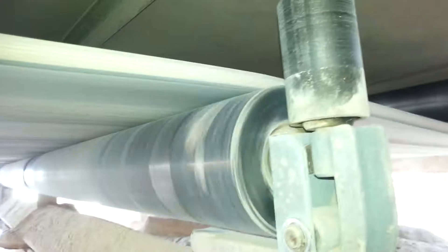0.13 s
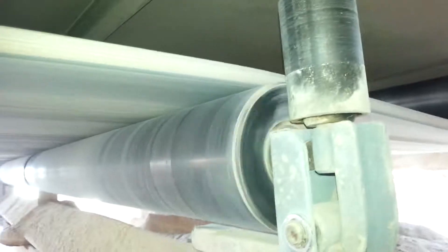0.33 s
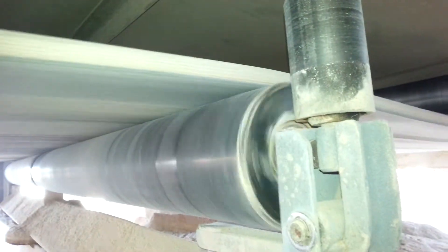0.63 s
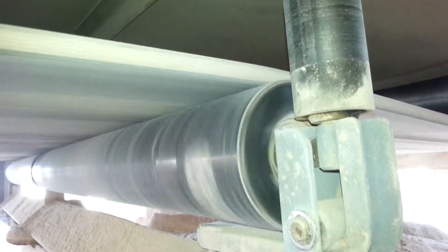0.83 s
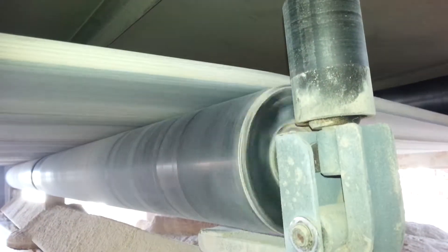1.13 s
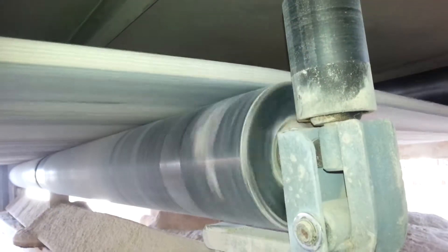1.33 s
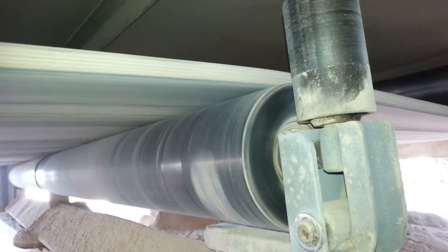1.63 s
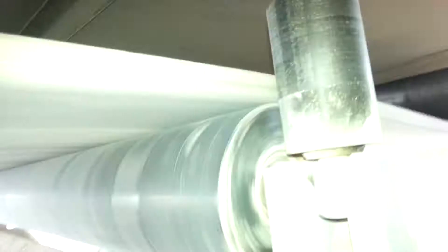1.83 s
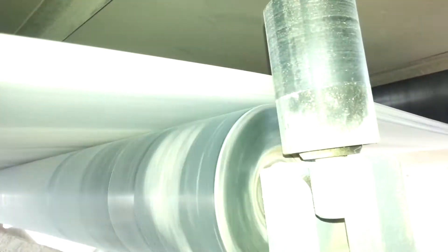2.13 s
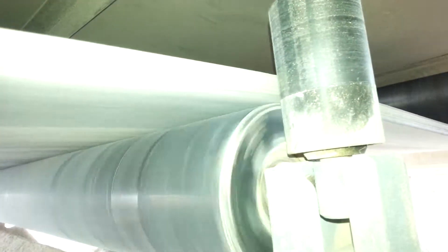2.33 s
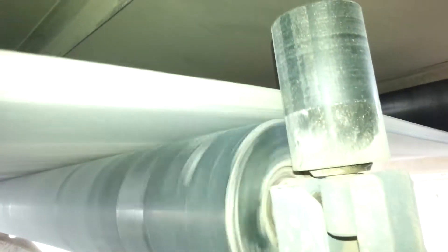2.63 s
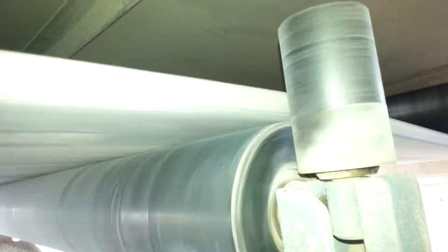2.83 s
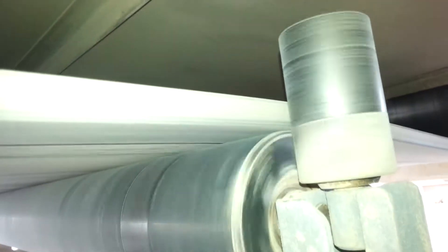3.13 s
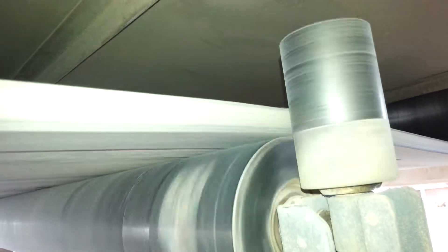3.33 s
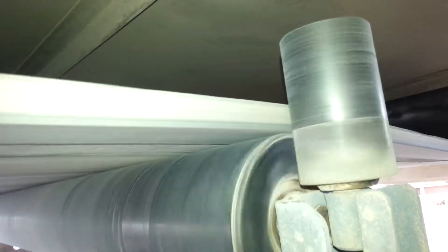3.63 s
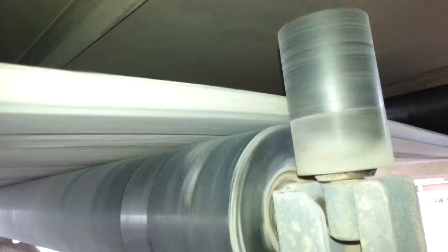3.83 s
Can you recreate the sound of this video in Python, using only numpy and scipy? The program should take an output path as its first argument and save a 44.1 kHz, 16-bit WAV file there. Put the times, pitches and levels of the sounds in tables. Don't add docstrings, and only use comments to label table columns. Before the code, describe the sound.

A conveyor belt roars nonstop in its steel frame as loose rollers rattle in irregular metallic clicks and dull thuds; worn bearings grind. Very close handheld phone, stereo, slightly overloaded, short industrial hall echo.

```python
import sys
import numpy as np
from scipy import signal
from scipy.fft import rfft, irfft
from scipy.io import wavfile
from scipy.ndimage import uniform_filter1d

SR = 44100
rng = np.random.default_rng(int(sys.argv[2]) if len(sys.argv) > 2 else 0)


def generate_wav(sig):
    pcm = np.round(np.clip(np.atleast_2d(sig).T, -1, 1) * 32767).astype(np.int16)
    wavfile.write(sys.argv[1], SR, pcm)


def undo_db(level):
    steps = np.asarray(level, float) / 20
    return 10 ** steps


N = 176400
T = np.arange(N) / SR
F = np.maximum(np.arange(N // 2 + 1) * SR / N, 1)
PORT_LAG_S, PORT_GAP_M, SOUND_M_PER_S = 0.0002675, 0.15, 343


# (frequency [Hz], density [dB per Hz])
ROAR_SPECTRUM = [
    (110, -52.5),
    (216, -8),
    (734, 1.5),
    (1500, 3.5),
    (3700, -2.5),
    (5800, -13),
    (9400, -16),
    (14400, -35.5),
]
# (time [s], load [dB], brightness [dB])
BELT_LOAD = [(0.3, -14, -5), (0.37, -12.5, -8), (1.21, -16, -4.5), (1.82, -13, -8), (2.0, -17, -5.5),
             (2.09, -13, -8.5), (2.71, -14.5, -8), (3.2, -11, -12.5), (3.51, -17.5, -2), (3.71, -13, -11.5),
             (3.88, -12, -9), (4.0, -18, -5)]
ROAR_DB, SWELL_DB, FLICKER_DB = -12.5, 0.5, 1


def belt():
    load = np.array(BELT_LOAD, float)
    level, bright = (np.interp(T, load[:, 0], c - c.mean()) for c in load[:, 1:].T)
    spectrum = rfft(field()) * undo_db(curve(ROAR_SPECTRUM, F))
    swell, roar = walk(8.1), 0
    for step in range(-3, 13):
        distance = np.clip(2 * np.log2(F / 250) - step, -1, 1)
        band = np.cos(np.pi / 2 * distance) ** 2
        tilt = np.clip(step / 10, 0, 1)
        band_db = level + tilt * bright + SWELL_DB * tilt * swell + FLICKER_DB * walk(14)
        roar = roar + irfft(spectrum * band, N) * undo_db(band_db)
    return undo_db(ROAR_DB) * unit(roar) + frame(level)


# (frequency [Hz], width [Hz], level [dB])
FRAME_MODES = [(187.3, 31, -15.5), (229.7, 58, -11.5), (411.4, 72, -6), (541.6, 130, 0.5), (674, 46, 0.5),
               (746.76, 61, 3.5), (829, 66, -4.5), (1042.5, 34, -5), (1210, 49, -2), (1970, 176, -4.5),
               (2450, 176, -8), (3160, 51, -5), (3390, 53, -8)]
FRAME_DB, FRAME_WALK_DB, FRAME_WALK_PER_S = -21, 2.5, 14


def frame(level_db):
    drive, out = field(), 0
    for hz, width_hz, db in FRAME_MODES:
        mode = unit(ring(ring(drive, hz, width_hz), hz, width_hz))
        out = out + undo_db(db + FRAME_WALK_DB * walk(FRAME_WALK_PER_S) + level_db) * mode
    return undo_db(FRAME_DB) * unit(out)


def field(near_share=0.12):
    flicker_db = 0.94 * np.array([walk(400), walk(400), walk(400)])
    a, b, close = rng.standard_normal((3, N)) * undo_db(flicker_db)
    coherence = np.sinc(2 * F * PORT_GAP_M / SOUND_M_PER_S)
    mid = rfft(a) * np.sqrt((1 + coherence) / 2)
    side = rfft(b) * np.sqrt((1 - coherence) / 2)
    around = irfft(np.array([mid + side, mid - side]), N)
    return np.sqrt(1 - near_share) * around + np.sqrt(near_share) * near(close)


# (time [s], peak [dB], ring [Hz], length [s])
ROLLER_RATTLES = [(0.383, -0.5, 3180, 0.02), (0.492, -4.5, 2680, 0.013), (0.743, -2.5, 3370, 0.0114),
                  (0.774, -4, 2000, 0.0152), (0.9165, -13, 2600, 0.013), (1.005, 0.5, 2660, 0.017),
                  (1.282, 1.5, 3590, 0.019), (1.445, 2, 3413, 0.025), (1.5395, 1.5, 2746, 0.0158),
                  (1.881, -17, 3240, 0.013), (1.955, -1, 3160, 0.037), (2.0909, -0.5, 3140, 0.022),
                  (2.228, 4.5, 3021, 0.012), (2.415, 0, 2390, 0.021), (2.4515, 1.5, 3800, 0.028),
                  (2.545, 3.5, 3000, 0.0093), (2.64, 4, 3020, 0.0165), (2.7404, 2.5, 1980, 0.013),
                  (2.85, -5, 2030, 0.0173), (3.23, -2, 2450, 0.032), (3.279, -3.5, 1980, 0.0146),
                  (3.366, 1.5, 2750, 0.035), (3.399, -8, 2660, 0.014), (3.446, -4, 3280, 0.015),
                  (3.624, -1.5, 3976, 0.019), (3.673, -4.5, 3140, 0.019), (3.834, 2.5, 1510, 0.034),
                  (3.944, -8, 2550, 0.015), (3.972, 1.5, 3160, 0.017)]
# (time [s], peak [dB], ring [Hz], length [s])
ROLLER_TICKS = [(0.312, -6, 2030, 0.006), (0.4464, -11, 2460, 0.006), (0.555, -9.5, 2710, 0.006),
                (0.723, -10, 3370, 0.006), (0.8134, -9, 3470, 0.006), (0.87, 3, 2910, 0.006),
                (0.879, 1, 2600, 0.006), (0.949, -9, 3420, 0.006), (1.187, -3.5, 3430, 0.006),
                (1.4174, -6, 2060, 0.006), (1.64, -3, 1910, 0.006), (2.0403, -1, 3420, 0.006),
                (2.07, -9, 1770, 0.006), (2.722, 9, 3150, 0.006), (2.825, -3, 3490, 0.006),
                (2.9644, -11, 4090, 0.006), (3.0134, -5, 3470, 0.006), (3.1234, 1, 2390, 0.006),
                (3.204, -2, 3440, 0.006), (3.547, 5, 3740, 0.006), (3.6, -2, 3540, 0.006)]
# (time [s], peak [dB], length [s])
ROLLER_CHATTER = [(0.437, -27, 0.016), (0.59, -28, 0.017), (0.67, -20.5, 0.014), (0.808, -8.5, 0.014),
                  (0.836, -4, 0.014), (1.027, 0.5, 0.025), (1.124, -4, 0.0126), (1.192, -5.5, 0.037),
                  (1.422, -8, 0.028), (1.624, -8, 0.019), (1.655, -7.5, 0.015), (1.707, -6, 0.026),
                  (1.797, -24, 0.015), (2.037, -8, 0.0098), (2.125, -1.5, 0.016), (2.296, -10, 0.022),
                  (2.356, -21, 0.028), (2.957, -23, 0.016), (3.048, -9, 0.0185), (3.133, -9, 0.019),
                  (3.187, -7.5, 0.038), (3.4726, -1.5, 0.028), (3.565, -26, 0.014), (3.857, -13, 0.012)]
RATTLE_DB, TICK_DB, CHATTER_DB, CHATTER_LOW_HZ = -11.5, -12.5, -9.5, 2620
RING_DB, RING_ROUGH = 1, 0.45


def rattles():
    wide, out = unit(steel(clicks())), np.zeros((2, N))
    thin = unit(signal.lfilter(*signal.butter(1, CHATTER_LOW_HZ, "high", fs=SR), wide))
    waver = RING_ROUGH * np.array([walk(220), walk(320)])
    for start, db, length in ROLLER_CHATTER:
        at, shape = burst(start, length)
        out[:, at] += undo_db(db + CHATTER_DB) * shape * thin[:, at]
    ticks = [(start, db + TICK_DB, hz, length) for start, db, hz, length in ROLLER_TICKS]
    for start, db, hz, length in ROLLER_RATTLES + ticks:
        at, shape = burst(start, length)
        _, ring_shape = burst(start, length / 2)
        knock = ring_shape * tone(hz, at, waver, 0.25 / hz)
        out[:, at] += undo_db(db + RATTLE_DB) * (shape * wide[:, at] + undo_db(RING_DB) * knock)
    return out


CLICKS_PER_S, CLICK_DB, CLICK_NOISE, SPREAD_SHARE = 2600, 3, 0.79, 0.749


def clicks():
    draw = rng.random((3, 2, N))
    hit = draw[:, 0] < CLICKS_PER_S / SR
    x = np.sign(draw[:, 1] - 0.5) * hit * undo_db(CLICK_DB * rng.exponential(size=(3, N)))
    x = unit(x) + CLICK_NOISE * rng.standard_normal((3, N))
    return np.sqrt(1 - SPREAD_SHARE) * near(x[0]) + np.sqrt(SPREAD_SHARE) * x[1:]


# (frequency [Hz], density [dB per Hz])
STEEL_COLOUR = [
    (300, -31),
    (900, -4.5),
    (2000, -1),
    (3800, 1.5),
    (5200, -6.5),
    (7000, -11.5),
    (10000, -14.5),
    (14500, -46.5),
]
# (frequency [Hz], width [Hz], level [dB])
SHELL_MODES = [(1990, 110, -0.5), (2450, 99, -5), (3039, 30, -7), (3456, 29, -15.5), (3897, 24.2, -11.5),
               (4850, 27, -1.5), (5284, 40, -7), (5900, 34, -7.5), (6570, 45, -3), (7530, 66, -2),
               (8585, 154, -4)]
SHELL_DB, SHELL_WALK_DB, SHELL_WALK_PER_S = 1, 4, 25


def steel(x):
    x = irfft(rfft(x) * undo_db(curve(STEEL_COLOUR, F)), N)
    shell = 0
    for hz, width_hz, db in SHELL_MODES:
        mode_db = db + SHELL_DB + SHELL_WALK_DB * walk(SHELL_WALK_PER_S)
        shell = shell + undo_db(mode_db) * ring(x, hz, width_hz)
    return x + shell


# (time [s], peak [dB], pitch [Hz], length [s])
BELT_THUDS = [(0.371, -4, 560, 0.027), (0.454, -11.5, 570, 0.017), (0.764, -3.5, 560, 0.025),
              (0.43, -3, 1097, 0.03), (0.449, -3, 757, 0.0156), (0.737, 0, 1170, 0.027),
              (0.777, -4.5, 810, 0.023), (0.919, -3, 750, 0.036), (1.086, -4, 685, 0.022),
              (1.398, -1, 716, 0.029), (1.544, -3, 875, 0.028), (1.596, -10, 1070, 0.024),
              (1.805, -14, 673, 0.027), (2.08, -13, 805, 0.039), (2.099, -4.5, 506, 0.039),
              (2.285, -9, 677, 0.032), (2.507, -6.5, 760, 0.031), (2.634, -8, 860, 0.027),
              (3.014, -14.5, 550, 0.023), (3.245, -13, 750, 0.041), (3.645, -4.5, 756, 0.039),
              (3.758, -4, 789, 0.027), (3.831, -4, 665, 0.025), (3.848, -3, 1240, 0.029),
              (3.846, 0, 1960, 0.03), (3.881, -3.5, 1260, 0.025)]
# (time [s], peak [dB], pitch [Hz], length [s])
BELT_BUMPS = [(0.55, -5.5, 1180, 0.024), (0.665, -7, 886, 0.018), (0.85, -13.5, 1180, 0.02),
              (1.177, -5, 1200, 0.02), (1.258, -13, 1180, 0.016), (1.351, -4, 773, 0.018),
              (1.47, -2, 729, 0.02), (1.48, -7, 1200, 0.018), (1.711, -1, 1163, 0.022),
              (1.984, -8, 756, 0.0175), (2.237, -8, 678, 0.018), (2.328, -4, 614, 0.02),
              (2.418, -16, 635.5, 0.02), (2.716, -19.5, 716, 0.0184), (2.848, -4, 759, 0.02),
              (2.884, -9, 752.5, 0.02), (2.945, -7, 743, 0.022), (3.097, -5.5, 743, 0.018),
              (3.413, -6.5, 725, 0.02), (3.895, -1.5, 969, 0.02)]
THUD_DB, BUMP_DB, THUD_WIDTH_HZ = -10.5, -2, 370
THUD_TONE_DB, THUD_NOISE_DB, THUD_ROUGH = 0, -5, 0.41


def thuds():
    contact, out, waver = clicks(), np.zeros((2, N)), THUD_ROUGH * walk(130)
    bumps = [(start, db + BUMP_DB, hz, length) for start, db, hz, length in BELT_BUMPS]
    for start, db, hz, length in BELT_THUDS + bumps:
        at, shape = burst(start, length)
        noise = unit(ring(ring(contact[:, at], hz, THUD_WIDTH_HZ), hz, 2 * THUD_WIDTH_HZ))
        body = undo_db(THUD_TONE_DB) * tone(hz, at, waver, PORT_LAG_S)
        out[:, at] += undo_db(db + THUD_DB) * shape * (undo_db(THUD_NOISE_DB) * noise + body)
    return out


GRIND_DB, GRIND_PER_S, GRIND_SPREAD_DB, GRIND_DECAY_S = -20.5, 87, 1.5, 0.011


def grind():
    hits = (rng.random(N) < GRIND_PER_S / SR) * undo_db(GRIND_SPREAD_DB * rng.standard_normal(N))
    envelope = signal.lfilter([1], [1, -np.exp(-1 / (GRIND_DECAY_S * SR))], hits)
    return undo_db(GRIND_DB) * unit(envelope * steel(clicks()))


# (time [s], length [s], pitch [Hz], level [dB])
BEARING_SQUEAKS = [
    (.537, .042, 5340, -26),
    (.606, .016, 5345, -25),
    (.525, .03, 5950, -30),
    (.735, .03, 5930, -33),
    (1.965, .03, 4880, -29),
]
SQUEAK_EDGE_S, SQUEAK_WAVER_DB = 0.0036, 3


def squeaks():
    waver_db, out = SQUEAK_WAVER_DB * walk(150), 0
    for start, length, hz, db in BEARING_SQUEAKS:
        edge_s = np.minimum(T - start, start + length - T)
        gate = np.clip(edge_s / SQUEAK_EDGE_S, 0, 1)
        out = out + undo_db(db + waver_db) * gate * np.sin(2 * np.pi * hz * T)
    return out


HALL_T60_S, HALL_DB, HALL_DELAY_S = 0.22, -9, 0.004


def hall(hits):
    t = T[:SR // 2]
    tail = rng.standard_normal((2, len(t))) * undo_db(-60 * t / HALL_T60_S) * (t > HALL_DELAY_S)
    tail = tail / np.sqrt(np.sum(tail ** 2, axis=1, keepdims=True))
    return undo_db(HALL_DB) * signal.fftconvolve(hits[::-1], tail, axes=1)[:, :N]


# (time [s], left [dB], right [dB])
LOW_THUMPS = [(.785, -58, -36), (1.55, -52, -53), (1.873, -29, -60), (2.237, -50, -49), (2.458, -51, -36),
              (2.553, -46, -45), (2.647, -44.5, -36.5), (3.385, -54.5, -58), (3.847, -45, -30.5),
              (3.868, -32.5, -48.5), (3.978, -35.5, -53.5)]
THUMP_S, THUMP_DB = 0.0014, 4.5
RUMBLE_DB, RUMBLE_HZ, RUMBLE_WALK_DB = -67.5, 90, 3.5


def thumps():
    lowpass = signal.butter(2, RUMBLE_HZ, fs=SR, output="sos")
    low = signal.sosfilt(lowpass, rng.standard_normal((2, N)))
    pushes = 0
    for start, left_db, right_db in LOW_THUMPS:
        gain = undo_db(np.array([[left_db], [right_db]]) + THUMP_DB)
        pushes = pushes + gain * np.exp(-((T - start) / THUMP_S) ** 2)
    return pushes + undo_db(RUMBLE_DB + RUMBLE_WALK_DB * walk(16)) * unit(low)


def curve(table, hz):
    points = np.array(table, float)
    return np.interp(np.log(hz), np.log(points[:, 0]), points[:, 1])


def unit(x):
    return x / np.sqrt(np.mean(x ** 2))


def ring(x, hz, width_hz):
    return signal.lfilter(*signal.iirpeak(hz, hz / width_hz, fs=SR), x)


def walk(rate_per_s):
    k = int(SR / rate_per_s)
    held = np.repeat(rng.standard_normal(N // k + 1), k)
    return unit(uniform_filter1d(uniform_filter1d(held, k), k)[:N])


ATTACK_S, RELEASE_S, SAG_S, CRACK_S, CRACK_SHARE = 0.0012, 0.009, 0.051, 0.0023, 0.46


def burst(start, length):
    first = int(start * SR)
    at = slice(first, first + SR // 6)
    t = np.maximum(T[at] - start, 0)
    attack = np.clip(t / ATTACK_S, 0, 1)
    hold = np.exp(-t / SAG_S) + CRACK_SHARE * np.exp(-t / CRACK_S)
    release = np.exp(-np.clip(t - length, 0, 2) / RELEASE_S)
    return at, attack * hold * release


def tone(hz, at, waver, lag_s):
    cycles = hz * np.array([T[at], T[at] - lag_s]) + rng.random()
    return np.sin(2 * np.pi * cycles) * np.cos(waver[..., at])


def near(x):
    return np.array([x, irfft(rfft(x) * np.exp(-2j * np.pi * F * PORT_LAG_S), N)])


def squash(x, knee, headroom):
    over = np.maximum(np.abs(x) - knee, 0)
    return x - np.sign(x) * (over - headroom * np.tanh(over / headroom))


def scene():
    hits = rattles() + grind() + thuds() + squeaks()
    return belt() + hits + hall(hits)


def top_cut(x):
    return signal.sosfilt(signal.butter(12, 14600, fs=SR, output="sos"), x)


# (frequency [Hz], left minus right [dB])
PORT_BALANCE = [
    (110, -10),
    (300, 0),
    (700, -3.5),
    (1300, 2.5),
    (2400, 0),
    (4500, 4.5),
    (9000, 1.5),
    (11500, 16.5),
    (14500, 40),
]
# (frequency [Hz], gain [dB])
MIC_LOSS = [
    (8000, 0),
    (11000, -2.5),
    (14500, -7),
]
DRIVE_DB, LOW_CUT_HZ, START_S, FADE_S = 0.17, 142, 0.25, 0.05


def record(dry):
    x = squash(dry * undo_db(DRIVE_DB), knee=0.62, headroom=0.28)
    balance_db = curve(PORT_BALANCE, F)
    port_db = np.array([balance_db, -balance_db]) / 2 + curve(MIC_LOSS, F)
    x = squash(irfft(rfft(x) * undo_db(port_db), N), knee=0.75, headroom=0.25)
    x = signal.sosfilt(signal.butter(4, LOW_CUT_HZ, "high", fs=SR, output="sos"), x) + thumps()
    mix = x * np.clip((T - START_S) / FADE_S, 0, 1)
    return top_cut(mix)


dry = scene()
out = record(dry)
generate_wav(out)
```